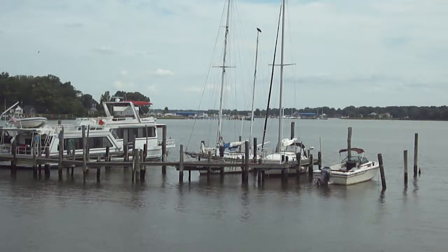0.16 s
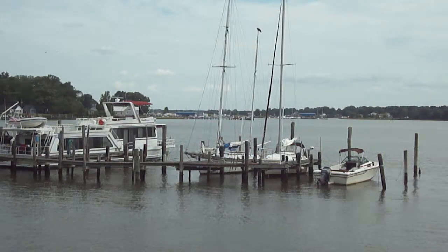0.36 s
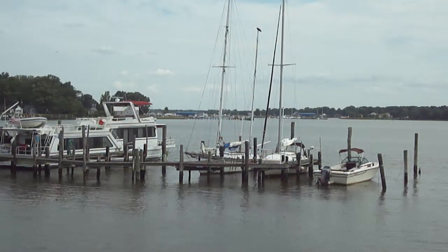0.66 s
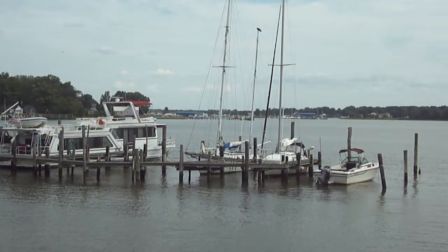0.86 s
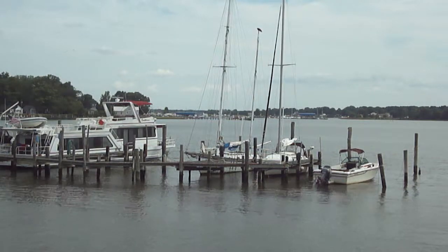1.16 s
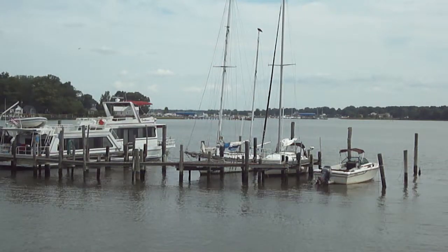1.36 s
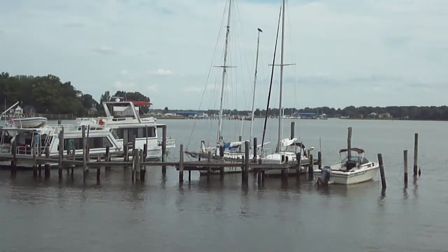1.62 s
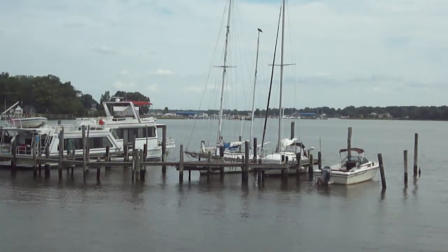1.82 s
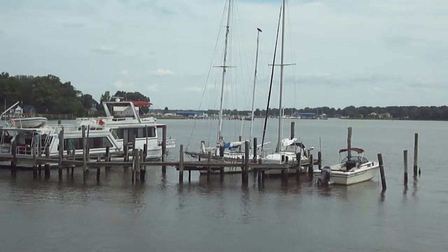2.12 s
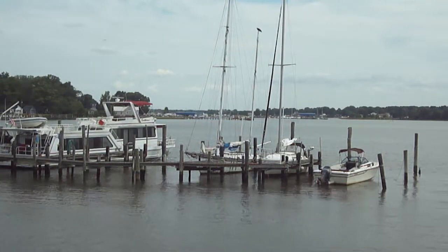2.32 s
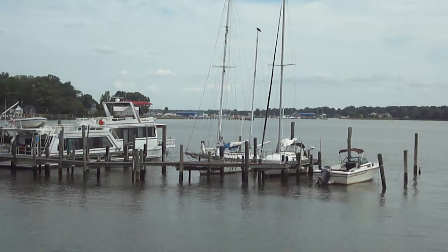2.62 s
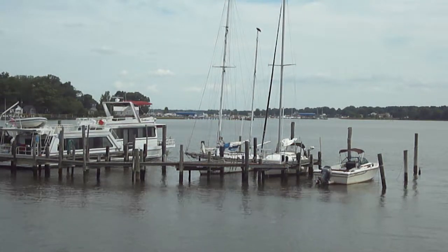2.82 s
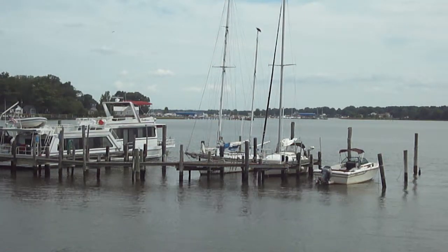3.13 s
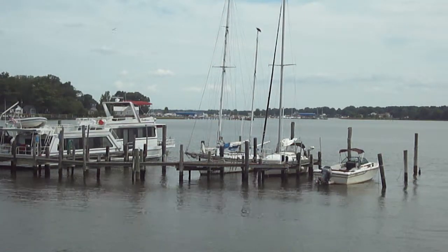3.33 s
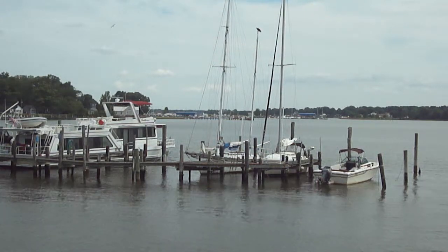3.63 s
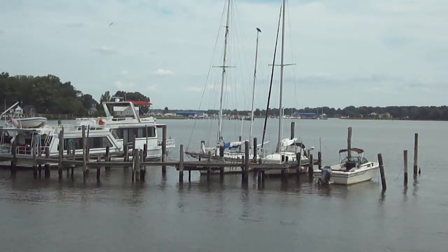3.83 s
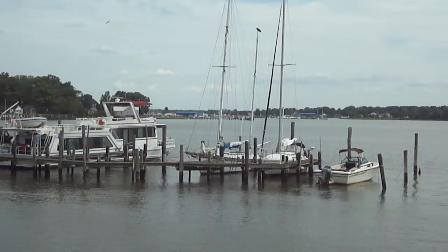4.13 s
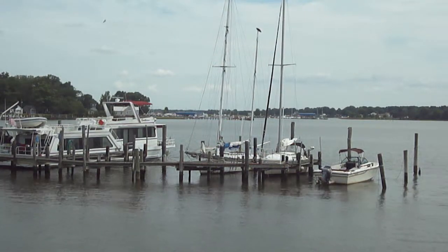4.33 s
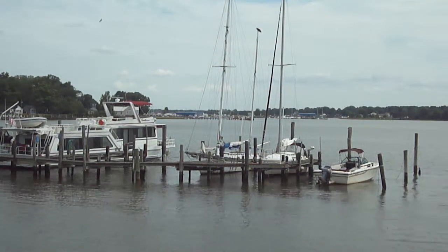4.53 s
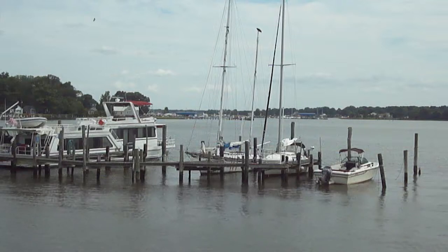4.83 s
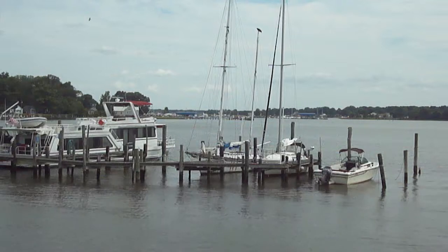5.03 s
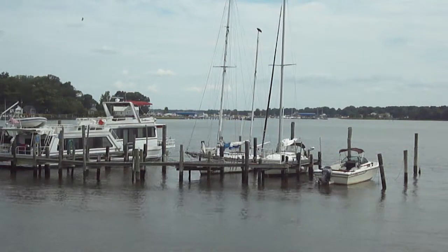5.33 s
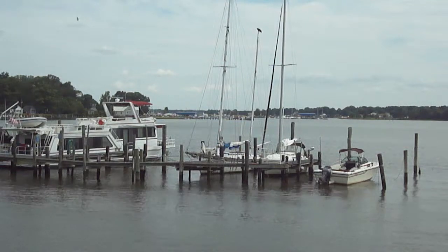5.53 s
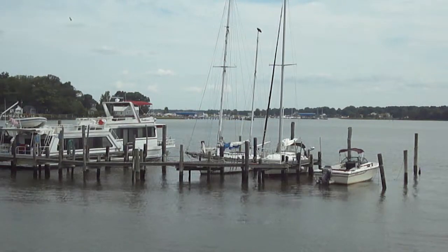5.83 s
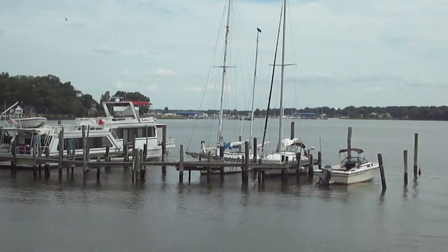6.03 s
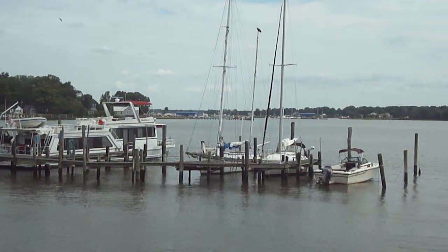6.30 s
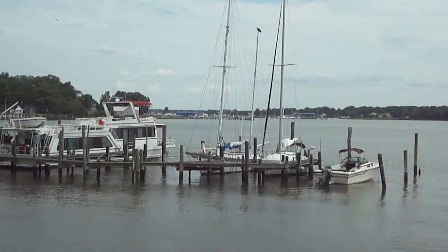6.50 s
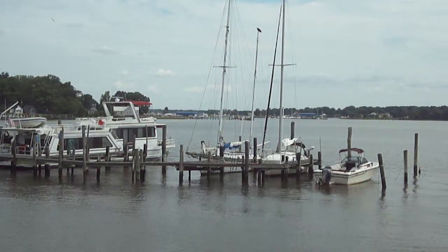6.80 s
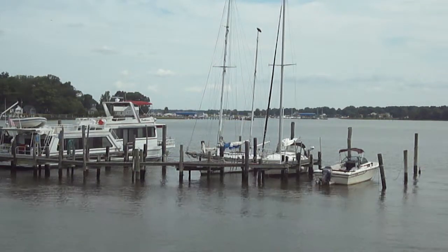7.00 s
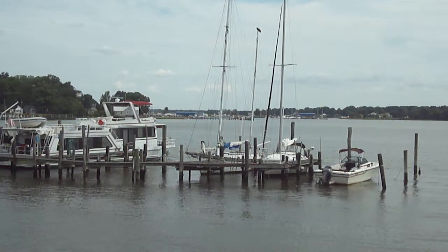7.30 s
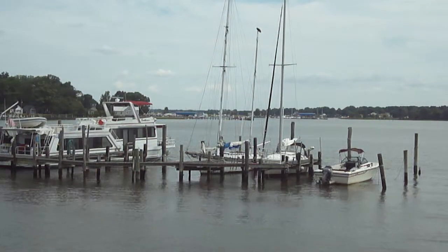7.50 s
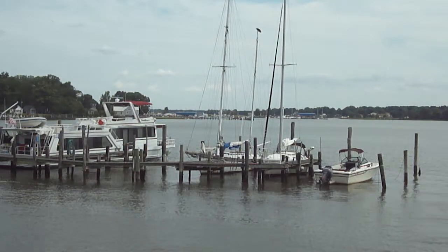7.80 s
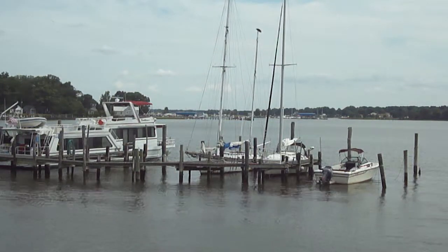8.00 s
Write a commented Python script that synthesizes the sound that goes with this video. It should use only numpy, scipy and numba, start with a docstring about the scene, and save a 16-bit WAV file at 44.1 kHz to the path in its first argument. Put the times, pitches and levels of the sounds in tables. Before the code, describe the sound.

A calm marina heard close to the water, with a steady soft hush of open water throughout. Bubbly waves wash against pilings, cresting most clearly near 1.7, 3.6, 5.6 and 7.6 seconds, with fine spray and small trickling plips. A nearby bird chirps quickly at 0.1 to 0.4, loudest around 0.8, warbles at 1.4 to 1.6, then gives falling whistles at 2.8 and 3.7, chirps at 4.9 and 5.3, and softer notes after 6.4, all lightly echoing from hulls. An insect rasps in fast pulsing phrases that swell and cut off every second or so. Water slaps wood with small plops around 1, 3.1, 5.1 and 7.1 seconds, sharpest at 5.1. Faint ringing mast taps come near 2, 3.1, 4, 5.8 and 6.5. From 7.5, a low breeze buffets the microphone.

```python
"""A marina on a calm day: a steady hush from open water, ripples, and bubbly waves every second or two.
From the start a bird chirps close by in gliding sines and an insect rasps in swelling phrases of noise pulses.
Water slaps the pilings in short noise bursts, with plops of trapped air as rising damped sines.
From about two seconds in, rigging taps a metal mast, a set of decaying modes.
After one faint early buffet, low wind noise buffets the microphone near the end and a breeze sets in."""
import sys
import numpy as np
from scipy import signal
from scipy.fft import irfft
from scipy.io import wavfile
from scipy.ndimage import uniform_filter1d
from numba import njit

SR = 44100
rng = np.random.default_rng(int(sys.argv[2]) if len(sys.argv) > 2 else 0)


def dump(signal):
    """Clip the signal to [-1, 1] and save it as 16-bit WAV at the path in sys.argv[1]."""
    limited = np.clip(np.atleast_2d(signal).T, -1, 1)
    pcm = np.round(limited * 32767).astype(np.int16)
    wavfile.write(sys.argv[1], SR, pcm)


N = 359415

# Waves reaching the pilings; rise and fall are the times to 10 dB below the crest
# columns: crest_s, wash_level_db, spray_level_db, rise_s, fall_s
WAVE_CRESTS = [(.20, -43, -57, .55, 0.37), (1.69, -33.5, -40.5, 0.29, 0.38), (3.27, -40, -47.5, 0.36, 0.41),
               (3.60, -31, -39, 0.37, 0.28), (4.05, -45, -49, 0.15, 0.69), (5.60, -32, -40.5, 0.46, 0.34),
               (6.54, -45, -62, 0.35, 0.3), (7.58, -31.5, -38.5, 0.37, .38)]
CALM_WASH_DB, CALM_SPRAY_DB = -48.5, -54.5  # floors between the waves
CREST_ROUNDNESS = 1.6  # 1 is a pointed crest, 2 a round one


def undb(db):
    """Decibels to gain."""
    return 10 ** (np.asarray(db) / 20)


def unit(x):
    """Scale to rms 1."""
    return x / np.sqrt(np.mean(x ** 2) + 1e-20)


def add(out, s, x):
    """Mix x into out from time s."""
    i = max(int(s * SR), 0)
    out[i:i + len(x)] += x[:max(N - i, 0)]


def colour(x, points):
    """Give x a spectrum of (Hz, relative dB) points, at rms 1."""
    hz, db = np.transpose(points)
    f = np.maximum(np.fft.rfftfreq(4096, 1 / SR), 1)
    low_cut = np.minimum(f / hz[0], 1) ** 2
    gain = undb(np.interp(np.log(f), np.log(hz), db)) * low_cut
    taps = np.fft.fftshift(irfft(gain))
    return unit(signal.fftconvolve(x, taps * np.hanning(len(taps)), "same"))


def band(x, lo_hz, hi_hz, order=2):
    """Band-pass between two edges."""
    edges = [lo_hz, min(hi_hz, SR / 2 - 1000)]
    return signal.sosfilt(signal.butter(order, edges, "band", fs=SR, output="sos"), x)


def walk(rate):
    """Random levels held 1 / rate s and slewed twice, at rms 1."""
    k = int(SR / rate)
    held = np.repeat(rng.standard_normal(N // k + 1), k)[:N]
    return unit(uniform_filter1d(uniform_filter1d(held, k), k))


def swell(peak_s, rise_s, fall_s, roundness):
    """A hump in dB: 0 at its peak, 10 dB down after the rise and fall times."""
    t = np.arange(N) / SR - peak_s
    return -10 * np.maximum(-t / rise_s, t / fall_s) ** roundness


def together(levels, floor_db):
    """The level in dB of several sounds at once, over a floor."""
    return 10 * np.log10(sum(undb(db) ** 2 for db in levels) + undb(floor_db) ** 2)


@njit
def ring(starts, hz, cycles, size, glide):
    """Bubbles: damped sines that die within their number of cycles while the pitch rises."""
    out = np.zeros(N)
    for k in range(len(starts)):
        first = int(starts[k] * SR)
        length = int(cycles[k] * SR / hz[k]) + 2
        z = size[k] + 0j
        p = np.exp(2j * np.pi * hz[k] / SR - 5.5 / length)  # turn and decay per sample
        rise = np.exp(2j * np.pi * hz[k] / SR * glide / length)
        for i in range(first, min(first + length, N)):
            out[i] += z.imag
            z *= p
            p *= rise
    return out


def bubbles(lo_hz, hi_hz, cycles, spread_db, count):
    """A cloud of ringing bubbles of all sizes, a few louder than the rest."""
    when, pitch, life, loud = rng.random((count, 4)).T
    hz = lo_hz * (hi_hz / lo_hz) ** np.sqrt(pitch)  # small ones are more common
    size = undb(spread_db * np.minimum(-np.log(1 - loud), 5)) * np.sqrt(hz / lo_hz)
    return unit(ring(when * N / SR, hz, cycles * (.5 + life), size, 0.2))


def marina(x, t60_s, gap_s):
    """Scattered echoes from hulls and pilings as decaying noise, without the direct sound."""
    t = np.arange(SR) / SR
    scatter = band(rng.standard_normal(SR), 200, 5800, order=1)
    tail = scatter * undb(-60 * t / t60_s) * (t > gap_s)
    return signal.fftconvolve(x, tail / np.sqrt(np.sum(tail ** 2)))[:N]


def shore():
    """The steady hush of open water and distant trees: coloured noise that barely wavers."""
    # Spectrum of the far background; columns: frequency_hz, relative_db
    hush_colour = [(30, -22), (70, -13.5), (150, -4.5), (400, 2.5), (1500, -8.5), (3000, -3.5),
                   (4500, -2.5), (6200, -11), (8500, -12.5), (11000, -19)]
    return colour(rng.standard_normal(N), hush_colour) * undb(-50.0 + 0.22 * walk(3.24))


def wash_level(lead_s):
    """The wash in dB swells and sinks with each crest, lead_s ahead of it."""
    humps = [db + swell(s - lead_s, rise, fall, CREST_ROUNDNESS) for s, db, _, rise, fall in WAVE_CRESTS]
    return together(humps, CALM_WASH_DB)


def waves(churn_noise_db=1, fizz_noise_db=1):
    """Each wave churns up bubbles; a finer spray crackles as the crest spills."""
    # Spectra of the churned water and the finer spray; columns: frequency_hz, relative_db
    wash_colour = [(60, -50), (130, -33), (200, -12), (480, -1.5), (900, 2.5), (1400, 2), (2200, 0),
                   (4000, -2), (5500, -5.5), (7000, -37), (11000, -33)]
    spray_colour = [(700, -11), (1800, -9), (4500, -7.5), (5800, -7), (6800, -13.5), (9000, -14),
                    (11000, -19.5)]
    spray_lead_s = 0.048  # spray peaks before the wash
    wash_db = wash_level(0)
    humps = [db + swell(s - spray_lead_s, rise, fall, CREST_ROUNDNESS)
             for s, _, db, rise, fall in WAVE_CRESTS]
    spray_db = together(humps, CALM_SPRAY_DB)
    churn = bubbles(235.0, 4485, cycles=21.8, spread_db=1.0, count=16000)
    churn = churn + undb(churn_noise_db) * rng.standard_normal(N)
    fizz = bubbles(1830, 11700, cycles=3.3, spread_db=4.0, count=24000)
    fizz = fizz + undb(fizz_noise_db) * rng.standard_normal(N)
    wash = colour(churn, wash_colour) * undb(wash_db + 0.93 * walk(25))
    spray = colour(fizz, spray_colour) * undb(spray_db + 1.0 * walk(35))
    return wash + spray


def ripples():
    """Sparse small bubble plips trickle round the pilings and grow as each wave comes in."""
    calm_db, follow, lead_s = -56, .45, 0.07  # follow: dB gained per dB of wash; lead over the wash
    plips = band(bubbles(464, 3680, cycles=29, spread_db=3.0, count=800), 350, 5000)
    return plips * undb(calm_db + follow * (wash_level(lead_s) - CALM_WASH_DB))


def phrasing():
    """Pulse rate, level, clearness and ring of the buzz: phrases swell and stop short; the loudest leads."""
    # Insect phrases; the clear share runs from 0 to 1
    # columns: loudest_s, stop_s, level_db, final_pulses_per_s, clear_share, body_ring_db
    phrases = [(0.208, 0.304, -41.5, 57, .15, 0), (0.738, 0.878, -39.5, 64, 0.63, 3.5),
               (1.514, 1.60, -39.5, 46, 0.2, 2), (1.97, 2.041, -38, 58, .45, -5),
               (2.918, 3.182, -38, 68, 0.1, 4), (3.501, 3.70, -45, 49, .25, -4),
               (4.11, 4.299, -37, 63, 0.3, 4), (5.401, 5.554, -36, 65, 0.3, 5),
               (5.798, 5.886, -45, 75, 0.5, 2), (6.586, 6.777, -37, 62, 0.16, 7),
               (7.696, 8.151, -37.5, 89, 0.4, -1)]
    early_pulses_per_s, rate_change_s = 54, .22  # the rate bends to its final value, mostly a faster one
    swell_s, sag_s, release_db_per_s, floor_db = 0.37, .5, 151, -56
    t = np.arange(N) / SR
    levels = []
    for s, stop, db, *_ in phrases:
        release = release_db_per_s * np.maximum(t - stop, 0)
        levels.append(db + swell(s, swell_s, sag_s, roundness=1.6) - release)
    leader = np.argmax(levels, axis=0)
    _, stop, _, final_rate, clear, body_db = np.array(phrases)[leader].T
    approach = np.exp(np.minimum(t - stop, 0) / rate_change_s)
    rate = early_pulses_per_s + (final_rate - early_pulses_per_s) * approach
    return rate, together(levels, floor_db), np.clip(clear, 0, 1), undb(body_db)


def insect(smear=0.6):
    """Rasping noise pulses over a faint steady buzz: crisp and ringing when direct, blurred when scattered."""
    # Spectrum of the rasp; columns: frequency_hz, relative_db
    buzz_colour = [(2500, -16), (3300, -14), (3850, 0), (4500, 2.5), (5300, 0), (5850, -1.5), (6300, -8.5),
                   (7100, -8), (7500, -13), (8400, -15), (9600, -32), (11000, -47)]
    # Resonances of the insect's body; columns: frequency_hz, pitch_spread_hz, relative_db
    resonances = [(3870, 70, 0), (5250, 80, -1)]
    body_ring_s = .0045  # the ring peaks this long after a pulse starts
    rate, db, clear, body = phrasing()
    cycle = np.cumsum(rate * (1 + 0.0051 * walk(30))) / SR % 1
    since = cycle / rate  # seconds since the last pulse began
    pulse = np.exp(-since / .0046) * np.minimum(since / .003, 1) ** 2
    # two narrow, wandering tones swell once in each pulse
    ringing = np.exp(-((since - body_ring_s) / body_ring_s) ** 2 * 2)
    tones = np.zeros(N)
    for hz, spread_hz, mode_db in resonances:
        phase = 2 * np.pi * np.cumsum(hz + spread_hz * walk(500)) / SR
        tones += undb(mode_db) * np.sin(phase)
    rasp = colour(rng.standard_normal(N) * pulse, buzz_colour)
    direct = (rasp + body * unit(tones * ringing)) / np.hypot(1, body)
    scattered = colour(rng.standard_normal(N) * (unit(pulse) / 2 + smear), buzz_colour)
    return (clear * direct + np.sqrt(1 - clear ** 2) * scattered) * undb(db)


def chirp(s, hold_s, hz, flick_to, flick_db, held_db, end_db):
    """Two notes: a flick down that leaps to a held tone and droops, then a lower note that fades."""
    # pitches are shares of the held pitch
    flick_s, flick_from, flick_swell_db = .021, 1.29, 15
    leap_s, leap_dip_db, hold_sag = 0.0064, 5, 0.0065  # the held tone starts softer and sinks slowly
    droop_s, droop_to, droop_fade_db = 0.015, .935, 15.5  # it bends down before it breaks
    end_s, end_from, end_to, end_fade_db = .034, .80, .71, 10
    turn = s + flick_s
    stop = turn + leap_s + hold_s
    drop = stop - leap_s
    flick = [(s, hz * flick_from, flick_db - flick_swell_db),
             (s + flick_s / 2, hz * (flick_from + flick_to) / 2, flick_db),
             (turn, hz * flick_to, flick_db)]
    held = [(turn + leap_s, hz, held_db - leap_dip_db),
            (stop - droop_s, hz * (1 - hold_sag), held_db),
            (stop, hz * droop_to, held_db - droop_fade_db)]
    end = [(drop, hz * end_from, end_db),
           (drop + end_s / 2, hz * (end_from + end_to) / 2, end_db),
           (drop + end_s, hz * end_to, end_db - end_fade_db)]
    return [(-13, flick + held), (-7.5, end)]  # each with its octave overtone in dB


def slur(s, length_s, from_hz, to_hz, bend, peak, db, overtone_db):
    """One falling whistle that swells and fades as it goes."""
    swell_db, fade_db, fade_bend = 9.5, 16, 1.46  # how much softer it starts and ends; above 1 fades late
    u = np.linspace(0, 1, 16)
    before = np.maximum(1 - u / peak, 0)
    after = np.maximum((u - peak) / (1 - peak), 0)
    softer = swell_db * before ** 2 + fade_db * after ** fade_bend
    pitch = from_hz + (to_hz - from_hz) * u ** bend
    return overtone_db, np.column_stack([s + u * length_s, pitch, db - softer])


def bird(third_db=-42, deck_share=.55, waver=.002, rasp=.028):
    """Gliding whistles with two overtones; a reflection off the deck makes the sweeps beat."""
    # Chirps; flick_bottom_share is the bottom of the flick as a share of the held pitch
    # columns: start_s, hold_s, held_pitch_hz, flick_bottom_share, flick_db, held_db, end_note_db
    chirps = [(0.073, .028, 2820, 0.81, -34, -27.5, -57), (0.179, 0.042, 3354, 0.73, -34, -28.5, -39),
              (0.75, 0.019, 3204, 0.81, -27.5, -21, -50), (.846, .058, 3589, 0.84, -24.5, -13.5, -25),
              (4.856, .064, 3192, 0.88, -34, -18.5, -34.5), (5.327, .072, 3264, 0.93, -33, -29.5, -33.5)]
    # Falling whistles; bend is 1 for a straight fall and less for a steep start
    # columns: start_s, length_s, from_hz, to_hz, bend, loudest_share_of_length, level_db, octave_overtone_db
    slurs = [(0.356, 0.042, 3230, 2500, 0.66, 0.8, -35, -19), (.40, .11, 2620, 2010, 1, 0.27, -51, -21),
             (2.847, 0.097, 2514, 1990, 1, 0.16, -21, -15), (3.733, 0.11, 3600, 2110, 0.55, 0.61, -16, -10),
             (4.466, 0.045, 5040, 5000, 1, .3, -42, -37), (6.371, 0.13, 2317, 1970, 0.78, 0.14, -25.5, -15),
             (6.841, 0.097, 2330, 1900, 1.2, .4, -45.5, -15)]
    # Wavering whistles; columns: octave_overtone_db, course (points of time_s, pitch_hz, level_db)
    warbles = [(-1.5, [(1.385, 2255, -44), (1.428, 2486, -29.5), (1.470, 2353, -36), (1.515, 2373, -35),
               (1.555, 2564, -27.5)]), (-13, [(1.560, 3220, -33.5), (1.592, 3390, -21), (1.606, 3516, -28),
               (1.613, 4005, -26.5), (1.633, 4013, -20.5), (1.660, 3880, -26)]), (-25, [(6.985, 4400, -39),
               (7.018, 5500, -39), (7.040, 4770, -41), (7.065, 4400, -50)])]
    deck_echo_s = .005216
    out = np.zeros(N)
    notes = [note for row in chirps for note in chirp(*row)]
    notes += [slur(*row) for row in slurs]
    notes += list(warbles)
    jitter = walk(900)
    for overtone_db, note in notes:
        s, hz, db = np.transpose(note)
        t = np.arange(s[0], s[-1], 1 / SR)
        pitch = uniform_filter1d(np.interp(t, s, hz), size=180)
        # the voice roughens in the fastest falls
        plunge = np.clip(-np.gradient(pitch) * SR / 55000, 0, 1) ** 3
        unsteady = 1 + (waver + rasp * plunge) * jitter[(t * SR).astype(int)]
        phase = 2 * np.pi * np.cumsum(pitch * unsteady) / SR
        fade = np.clip(np.minimum(t - t[0], t[-1] - t) / 0.004, 0, 1)
        voice = np.sin(phase) + undb(overtone_db) * np.sin(2 * phase) + undb(third_db) * np.sin(3 * phase)
        add(out, s[0], voice * fade * undb(np.interp(t, s, db)))
    lag = int(round(deck_echo_s * SR))
    reflected = np.pad(out, (lag, 0))[:N]
    out = band(out + deck_share * reflected, 1100, 5070, order=3)
    # nearby hulls answer briefly, the far boats and the shore linger
    near = undb(-17) * marina(out, t60_s=0.14, gap_s=0.019)
    far = undb(-18) * marina(out, t60_s=1.42, gap_s=0.016)
    return out + near + far


def wind():
    """Low noise: short buffets on the microphone, and a breeze that sets in near the end."""
    # Wind buffets at the microphone; columns: start_s, length_s, level_db
    buffets = [(.25, 0.024, -57), (6.55, 0.034, -55), (7.536, 0.074, -43.5), (7.732, 0.011, -39.5),
               (7.851, 0.057, -39.5), (8.011, .05, -37), (8.09, 0.065, -44)]
    attack_s, release_s = 0.0059, 0.015
    breeze_from_s, breeze_db = 7.52, -55  # under the last buffets
    t = np.arange(N) / SR
    gusts = np.zeros(N)
    for s, length, db in buffets:
        before = np.maximum(s - t, 0) / attack_s
        after = np.maximum(t - s - length, 0) / release_s
        gusts += undb(db) * np.exp(-before - after)
    breeze = undb(breeze_db) * np.clip((t - breeze_from_s) / attack_s, 0, 1)
    return unit(band(rng.standard_normal(N), 71, 256)) * np.hypot(gusts, breeze)


def slaps():
    """Crests hit wood with a crack and a short noise splash; trapped air plops as rising sines."""
    # Water slapping wood, levels ahead of the last band-pass; the splash band is set around nominal_hz
    # columns: start_s, peak_db, nominal_hz, decay_time_constant_s
    splashes = [(.262, -30, 880, 0.0066), (1.029, -28, 1020, .005), (1.059, -25, 4470, .0053),
                (1.161, -26, 1117, 0.0042), (1.429, -24, 8150, 0.0016), (1.454, -23, 1310, 0.0045),
                (2.528, -28, 1120, 0.0045), (3.062, -22.5, 4170, 0.004), (3.066, -18, 950, 0.0054),
                (3.132, -26, 4950, .0043), (3.143, -18.5, 2900, 0.0051), (3.208, -25, 2200, 0.0073),
                (3.246, -23, 860, 0.066), (4.967, -23.5, 1500, 0.0052), (5.0709, -11.5, 2120, 0.0023),
                (5.073, -25.5, 900, 0.0046), (5.084, -18.5, 3220, .0081), (7.014, -27.5, 1420, 0.018),
                (7.055, -27, 3000, 0.015), (7.166, -26, 3920, .0068), (7.283, -33, 1194, 0.0022),
                (7.304, -25, 6740, .0024)]
    # Large single bubbles, levels ahead of the last band-pass; columns: start_s, peak_db, pitch_hz
    plops = [(0.271, -35, 520), (1.305, -39, 513), (1.517, -21.5, 2010), (3.168, -24, 1150),
             (3.211, -21, 700), (3.217, -24, 1170), (3.576, -21.5, 593), (5.595, -30, 970),
             (5.656, -29, 527), (5.948, -25, 1820), (6.824, -32.5, 1078), (7.07, -27.5, 885),
             (7.193, -19.5, 2880)]
    out = np.zeros(N)
    t = np.arange(SR // 8) / SR
    for s, db, hz, decay_s in splashes:
        splash = rng.standard_normal(len(t)) * np.exp(-t / decay_s)
        splash[0] += 0.0051 / decay_s  # the shorter the blow, the harder its crack
        splash = band(splash, hz / 2.0, hz * 1.35, order=1)
        add(out, s, undb(db) * splash / np.abs(splash).max())
    s, db, hz = np.array(plops, float).T.copy()
    air = ring(s, hz, np.full(len(s), 22.), undb(db), 0.16)
    return band(out + air, 325, 9200)


def mast(contact_s=0.0011):
    """Rigging taps the hollow metal mast; every tap feeds energy into modes that ring on."""
    # Ringing modes of the mast; columns: frequency_hz, relative_db, t60_s
    modes = [(366, -13, 1.6), (1810, 0, .95), (1861, -14, .5), (2810, 0, .5), (2906, -11, .4),
             (4232, -1, .45), (4371, -9, .45), (5670, -10, .4), (7110, -15, .35)]
    # Rigging taps; brightness tilts the modes about the second one
    # columns: start_s, level_db, brightness_db_per_octave
    taps = [(1.932, -40, 6.5), (2.021, -43, -2.5), (3.139, -46, -2.5), (4.03, -41.5, -1), (5.822, -39, 0.5),
            (5.95, -49, 3), (6.458, -39.5, 1), (6.656, -44.5, 4)]
    out = np.zeros(N)
    t = np.arange(N) / SR
    s, db, bright_db = np.transpose(taps)
    for hz, mode_db, t60 in modes:
        fed = np.zeros(N)
        fed[(s * SR).astype(int)] = undb(db + mode_db + bright_db * np.log2(hz / modes[1][0])) ** 2
        keep = np.exp(-2 * np.log(1000) / (t60 * SR))  # share of energy left after a sample
        energy = signal.lfilter([1], [1, -keep], fed + 1e-18)
        level = uniform_filter1d(np.sqrt(energy), int(contact_s * SR) + 1)
        out += level * np.sin(2 * np.pi * hz * t)
    return out


def scene():
    """All sources at one microphone."""
    hits = slaps()
    echoes = undb(-11.5) * marina(hits, t60_s=0.17, gap_s=0.0057)
    water = waves() + ripples() + hits + echoes
    return (water + bird() + insect() + mast() + wind() + shore())[None]


def record(dry):
    """The recorder cuts the top steeply above 11 kHz."""
    return signal.sosfilt(signal.ellip(12, .2, 80, 11000, fs=SR, output="sos"), dry)


dry = scene()
out = record(dry)
dump(out)
```